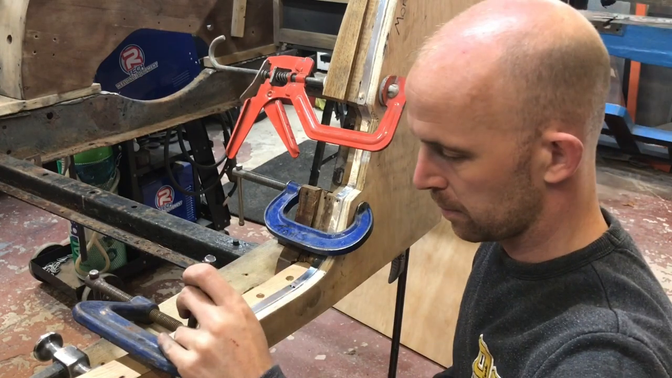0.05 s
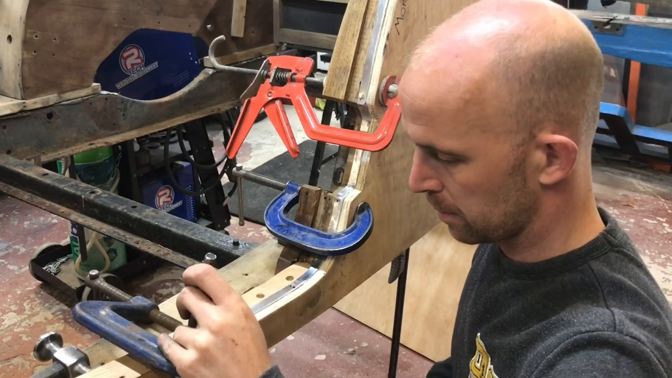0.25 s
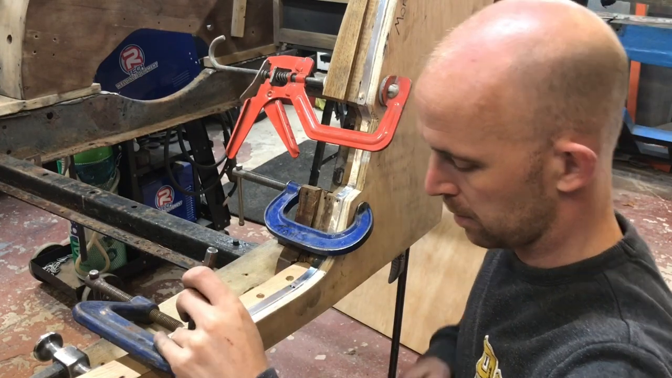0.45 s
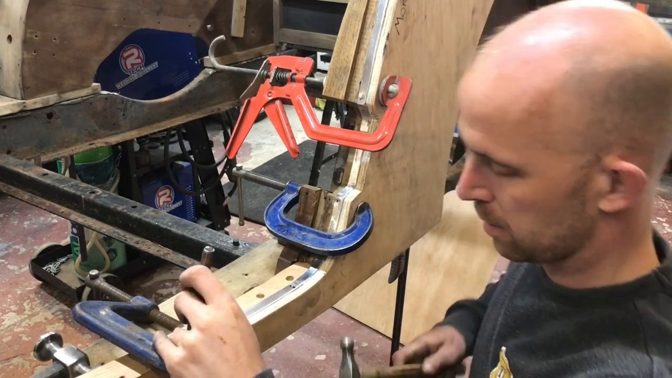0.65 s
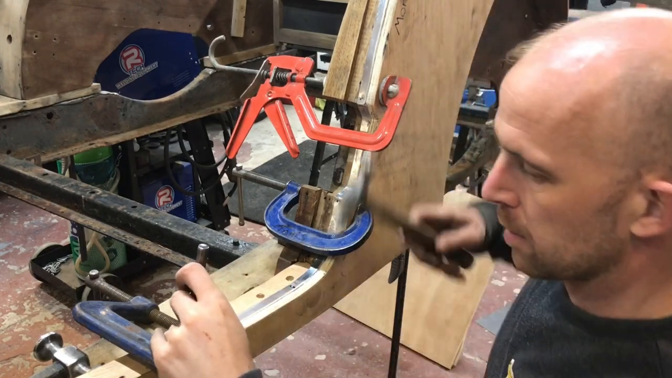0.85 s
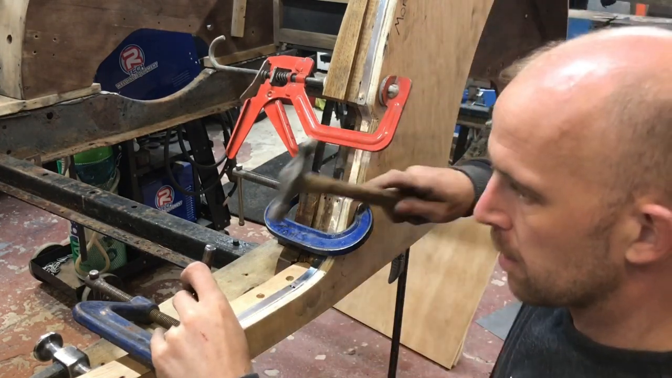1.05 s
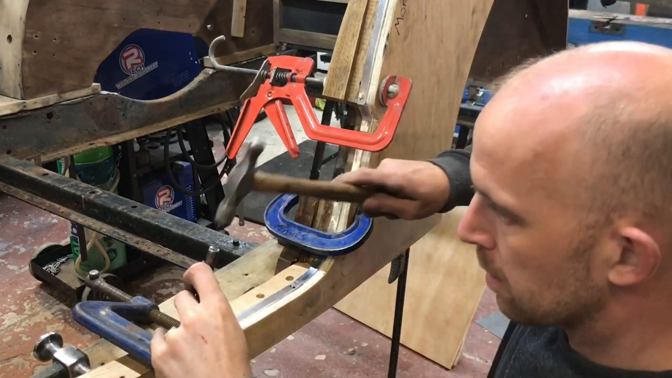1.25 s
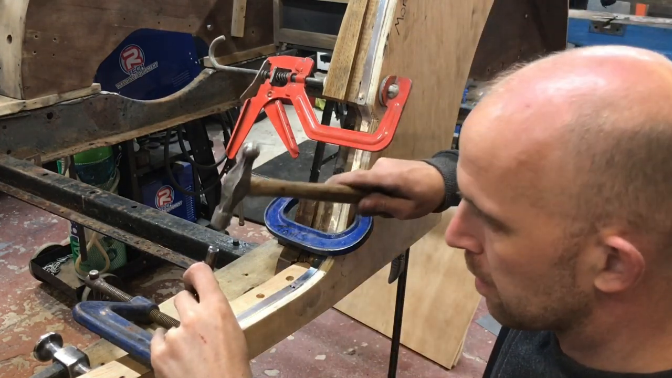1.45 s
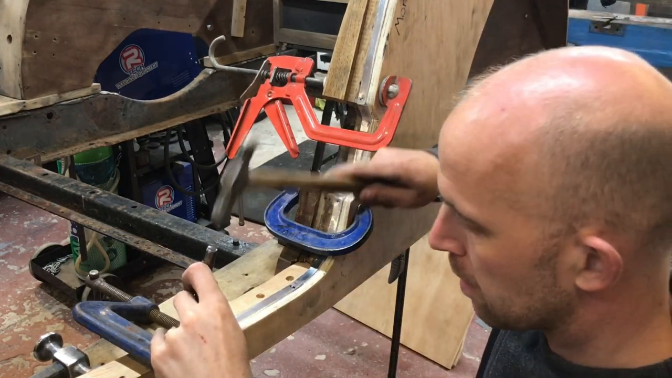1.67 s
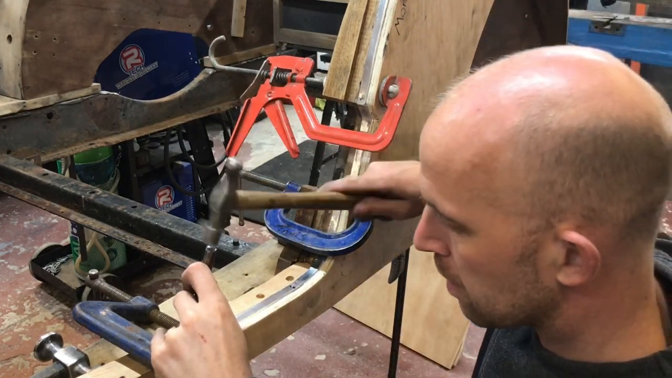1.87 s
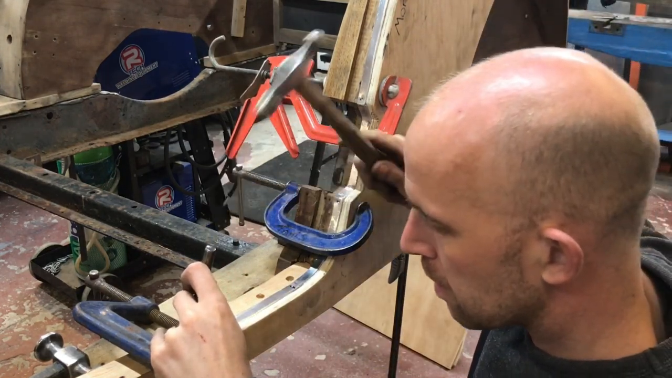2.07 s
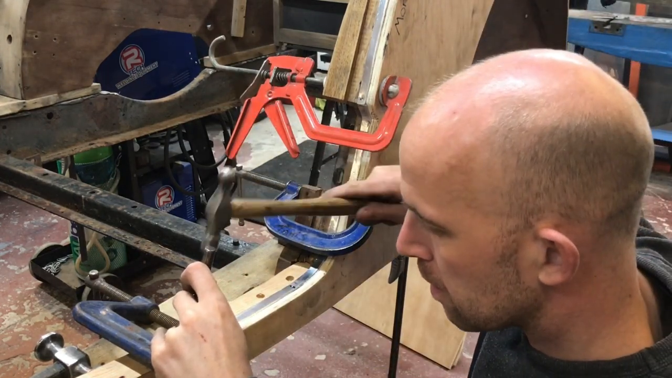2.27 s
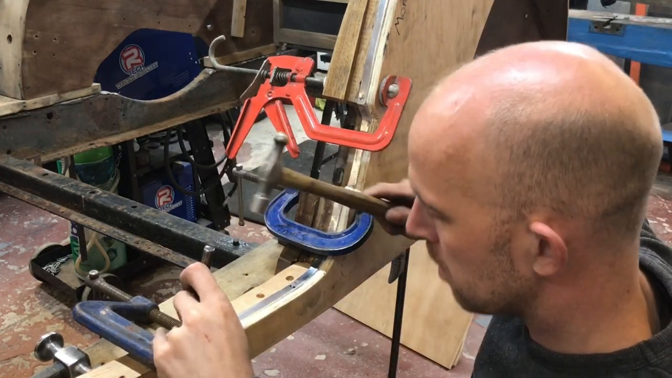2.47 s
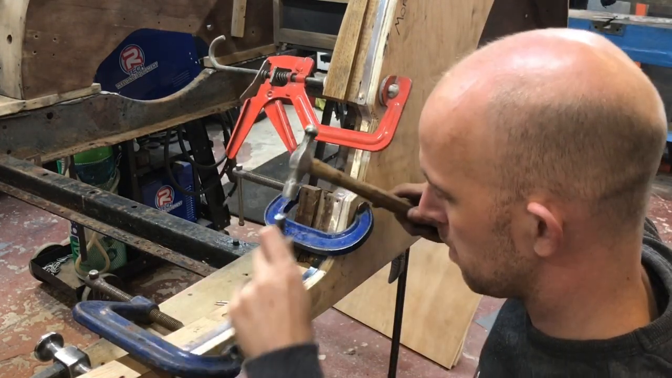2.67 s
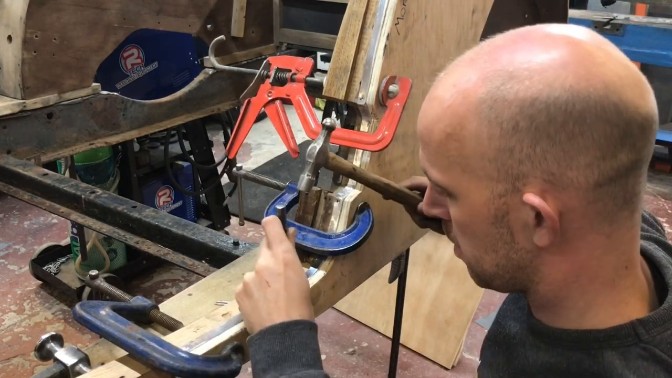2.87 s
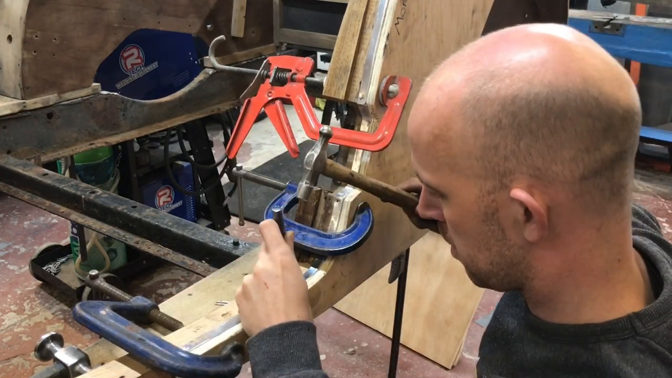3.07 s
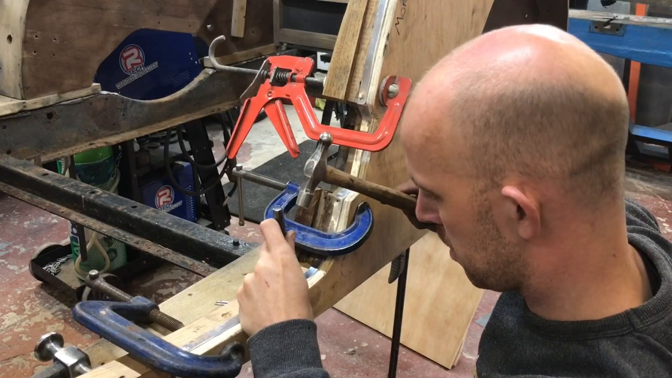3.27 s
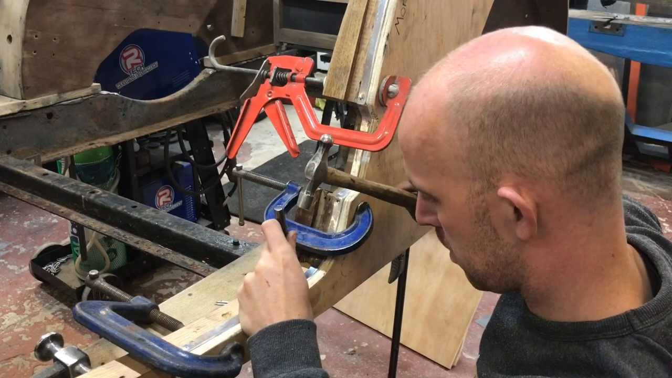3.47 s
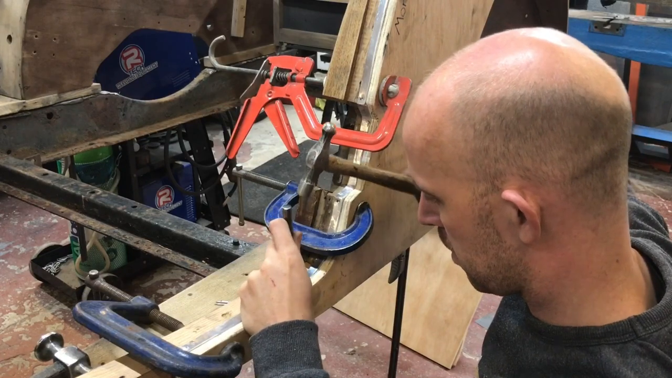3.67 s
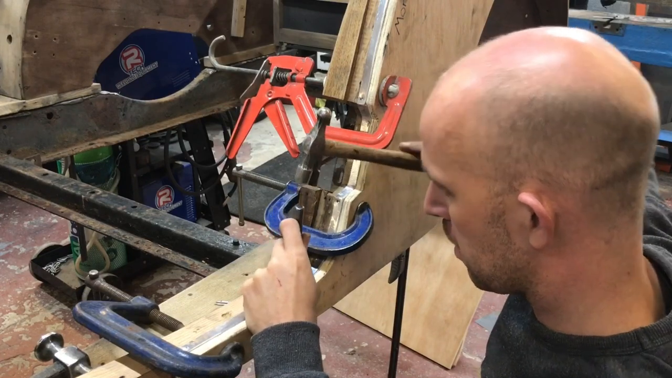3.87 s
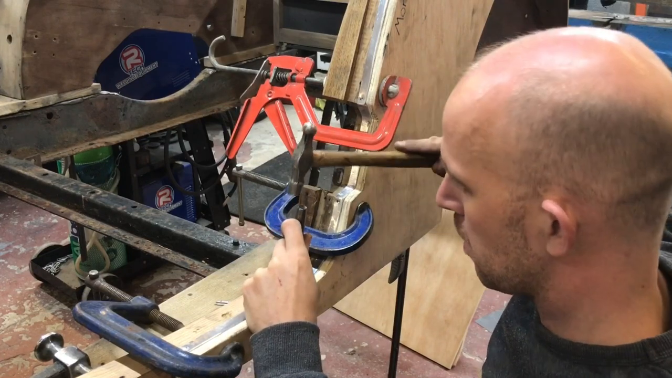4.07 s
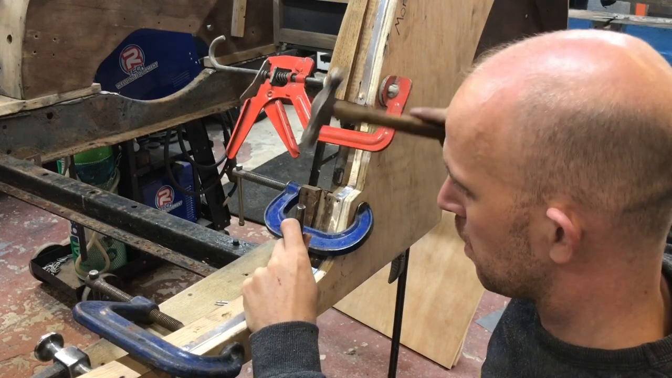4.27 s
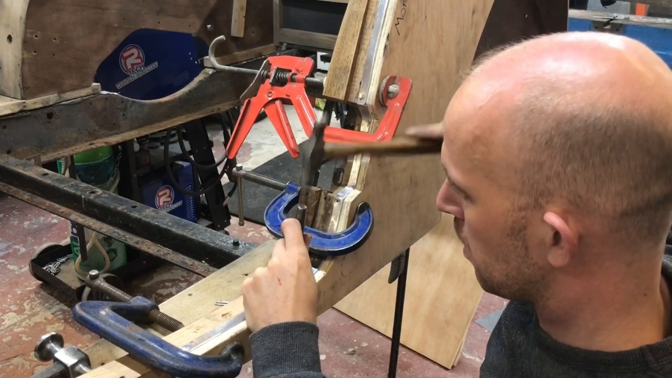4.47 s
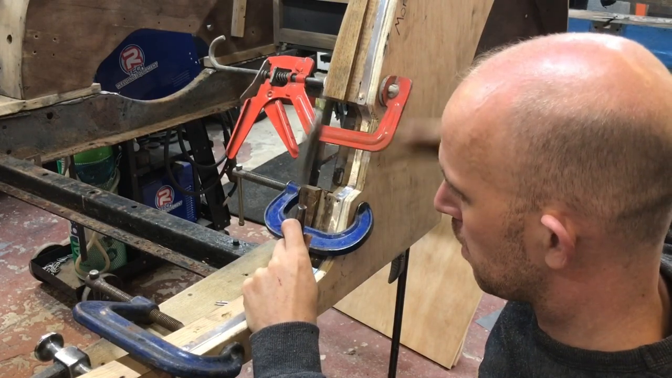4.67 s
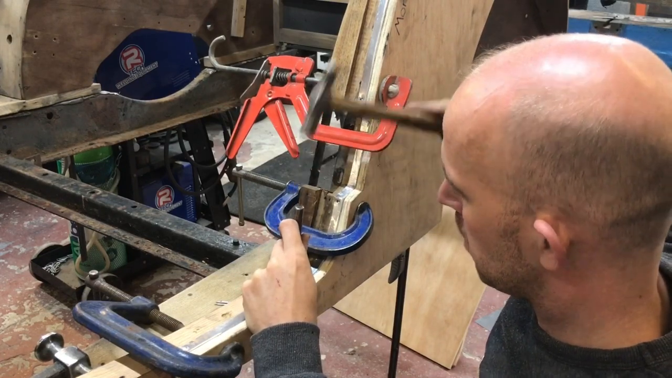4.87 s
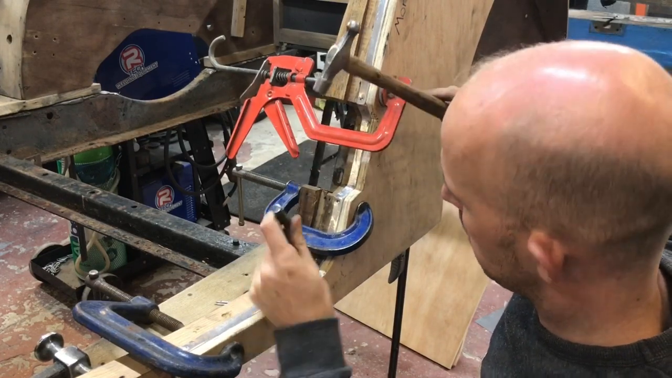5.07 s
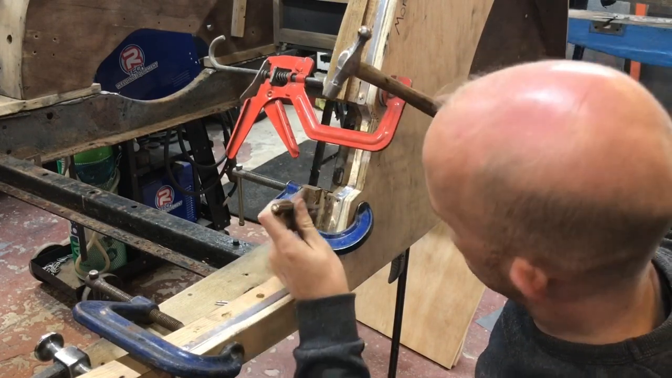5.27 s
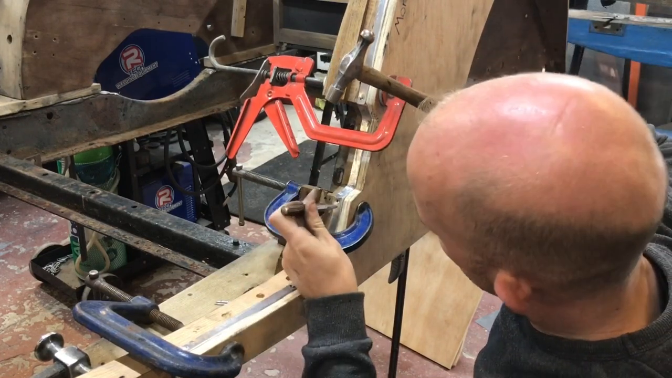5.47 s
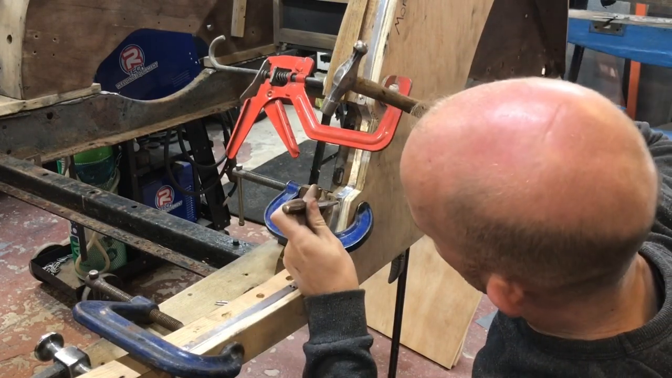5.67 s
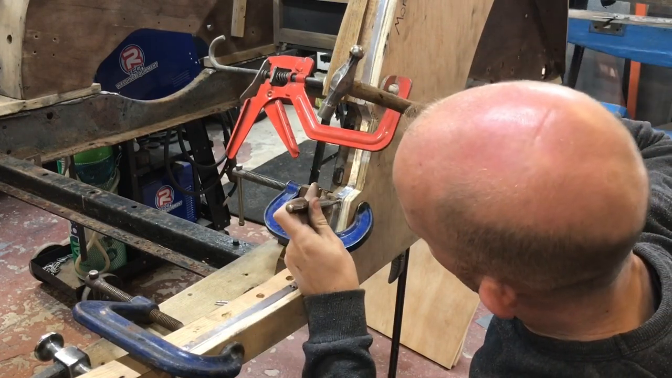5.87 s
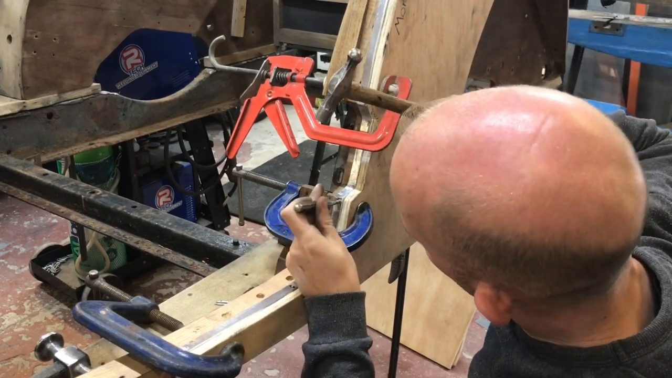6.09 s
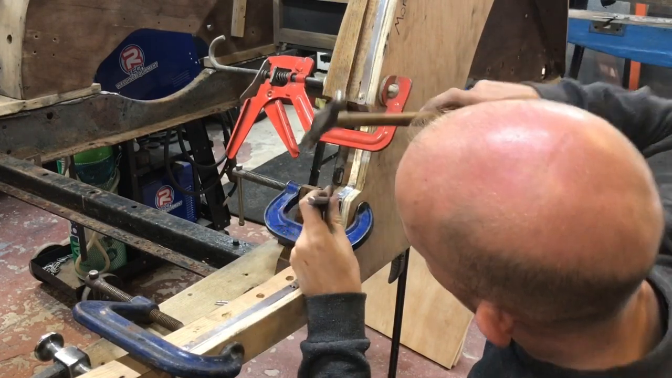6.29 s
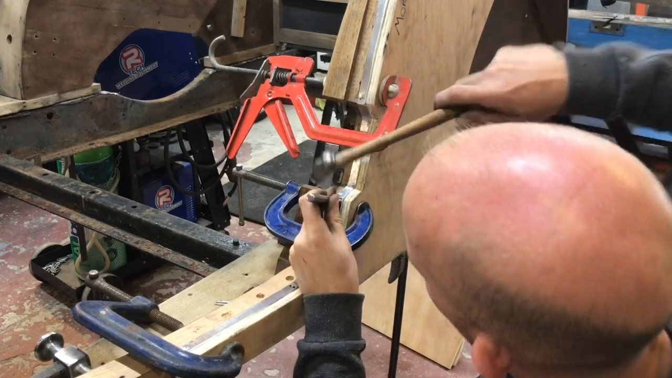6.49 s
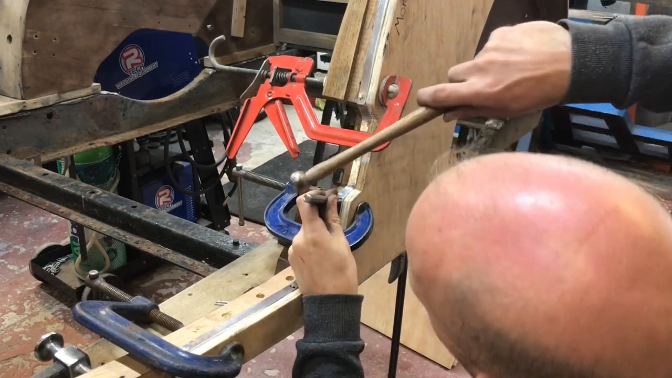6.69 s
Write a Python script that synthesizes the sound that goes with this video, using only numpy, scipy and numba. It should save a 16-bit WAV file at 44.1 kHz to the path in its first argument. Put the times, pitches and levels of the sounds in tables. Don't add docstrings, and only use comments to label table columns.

```python
import sys
import numpy as np
from scipy import signal
from scipy.fft import rfft, irfft
from scipy.io import wavfile
from scipy.ndimage import uniform_filter1d
from numba import njit

SR = 44100
rng = np.random.default_rng(int(sys.argv[2]) if len(sys.argv) > 2 else 0)


def natural_amplitude(level_db):
    exponent = np.asarray(level_db, float) / 20
    return 10 ** exponent


def generate_wav(signal):
    frames = np.transpose(np.atleast_2d(signal))
    scaled = np.clip(frames, -1, 1) * 32767
    pcm = np.round(scaled).astype(np.int16)
    wavfile.write(sys.argv[1], SR, pcm)


N = 296793


def curve(table, size):
    hz, value = np.transpose(table)
    bins_hz = np.arange(size // 2 + 1) * SR / size
    return np.interp(np.log(bins_hz + 1), np.log(hz), value)


def causal(db, size):
    cepstrum = irfft(db * np.log(10) / 20, size)
    cepstrum[1:size // 2] *= 2
    cepstrum[size // 2 + 1:] = 0
    return irfft(np.exp(rfft(cepstrum)), size)


def unit(x):
    return x / np.sqrt(np.sum(x ** 2))


def even(x, spread):
    size = 2 * len(x)
    power = uniform_filter1d(abs(rfft(x, size)) ** 2, spread)
    db = 10 * np.log10(power + 1e-12)
    return unit(signal.fftconvolve(x, causal(-db, size))[:len(x)])


def noise(table, db):
    white = rfft(rng.standard_normal(N))
    x = irfft(white * natural_amplitude(curve(table, N)), N)
    return unit(x) * np.sqrt(N) * natural_amplitude(db)


def walk(rate_hz):
    hold = int(SR / rate_hz)
    steps = np.repeat(rng.standard_normal(N // hold + 1), hold)
    return 2.2 * uniform_filter1d(uniform_filter1d(steps, hold), hold)[:N]


def modes(table, t):
    chance = rng.standard_normal((len(table), 2)) * [1.5, .0007]
    out = 0
    for (hz, db, t60), (more_db, detune) in zip(table, chance):
        fall = np.exp(-np.log(1000) * t / t60)
        out = out + natural_amplitude(db + more_db) * np.sin(2 * np.pi * hz * (1 + detune) * t) * fall
    return out


# (pitch_hz, level_db, partner_hz, cancel_s: when the two cancel)
HUM_BEATS = [
    (46.69, -65.9, 46.69, 0),
    (48.59, -58.7, 46.69, 3.466),
    (93.38, -50.2, 93.38, 0),
    (97.17, -59.0, 93.38, 3.244),
    (99.97, -58.8, 93.38, 3.2265),
]
FAINT_HUM_HZ = [73.79, 119.51, 145.76, 163.45, 186.79, 276.55, 323.25, 923.1, 1330.7, 1555, 1700.7]
FAINT_HUM_DB = [-67, -66, -62.5, -71.5, -65, -66.5, -68.5, -77.5, -85.5, -81.5, -84]
# (pitch_hz, level_db per Hz)
AIR_COLOUR = [(25, -19), (45, -4), (80, -5), (200, -9), (330, -12.5), (450, -20), (900, -19), (1600, -28),
              (2100, -34), (5000, -41), (9000, -43.5), (10500, -45), (13000, -44), (15700, -46.5)]


def hum():
    t = np.arange(N) / SR
    out = 0
    for hz, db, partner, s in HUM_BEATS:
        turns = hz * (t - s) + partner * s + (s > 0) / 2
        out = out + natural_amplitude(db + 3.5) * np.cos(2 * np.pi * turns)
    for hz, db in zip(FAINT_HUM_HZ, FAINT_HUM_DB):
        level = natural_amplitude(db + 3 + 1.5 * walk(3))
        out = out + level * np.cos(2 * np.pi * (hz * t + rng.random()))
    return out + noise(AIR_COLOUR, -56) * natural_amplitude(.6 * walk(0.61))


# (pitch_hz, level_db, t60_s: time to fall by 60 dB)
PUNCH_RING = [(8489, 0, .06), (8492, -17, .3), (9921, -16, .05)]
# (pitch_hz, level_db under the blow, t60_s)
HEAD_RING = [(7522, -27.5, 0.067), (14650, -30.5, .15), (5700, -24, .08)]
# (pitch_hz, level_db under the blow, t60_s)
STRIP_CLANK = [(630, -18.5, .12), (806, -10.5, 0.2), (1086, -9.5, .1), (2320, -11.5, 0.034),
               (2810, -15, 0.063), (3115, -9.5, 0.036), (3520, -6, 0.045), (5040, -9, 0.017)]
LEAD = SR // 2


def hammer(blows, body, rings):
    size = 8192
    out = np.zeros((2, N + LEAD + size))
    t, hz = np.arange(size) / SR, np.arange(size // 2 + 1) * SR / size
    lift = sum(db / (1 + (2 * (hz - f) / width) ** 2) for f, width, db in rings)
    for s, power_db, boom_db, bite_db, punch_db in blows:
        grains = rng.standard_normal(size) * natural_amplitude(7.4 * rng.standard_normal(size))
        chatter = unit(grains * np.exp(-t / 0.0028))
        rattle = unit(grains[::-1] * np.exp(-t / 0.0092))
        contact = natural_amplitude(4.5) * chatter + natural_amplitude(-2.0) * rattle
        contact[0] += natural_amplitude(-9.0)
        tilt = curve([(350, boom_db), (700, 0.0034), (1400, 0.0031), (2400, bite_db), (4000, bite_db),
                      (7000, -0.08)], size)
        response = causal(curve(body, size) + lift + tilt, size)
        ring = unit(signal.fftconvolve(even(contact, spread=30), response)[:size])
        punch = natural_amplitude(punch_db) * modes(PUNCH_RING, t)
        start = LEAD + int(s * SR)
        blow = natural_amplitude(power_db) * (np.sqrt(.045 * SR) * ring + modes(HEAD_RING, t))
        out[0, start:start + size] += blow + natural_amplitude(-4.5) * punch
        swell = 1 - 0.52 * np.exp(-(t / 0.0016) ** 2)
        out[1, start:start + size] += punch * swell + natural_amplitude(power_db) * modes(STRIP_CLANK, t)
    return out


# (pitch_hz, t60_s)
SHED_RING = [(100, 1), (260, 0.89), (700, 0.8), (1840, 0.68), (3000, 0.67), (4200, 0.65), (6000, .5),
             (9000, 0.48), (12800, 0.35), (16000, 0.25)]
# (delay_s, level_db)
FIRST_ECHOES = [(.0018, -5.5), (.0055, 2.5), (.0085, 2), (0.01, -9.5), (0.019, -14.5), (.027, -18.5)]


def shed(direct_db, early_db, corner_db, corner_share, rise_s, rise_cycles):
    t, bins = np.arange(SR) / SR, np.log2(np.arange(SR // 2 + 1) + 1)
    white, tail = rfft(rng.standard_normal(SR)), 0
    for octave in np.arange(6, 14.5, .5):
        hz = int(2 ** octave)
        share = np.clip(1 - 2 * abs(bins - octave), 0, 1)
        fall = np.log(1000) * t / curve(SHED_RING, SR)[hz]
        rise = 1 - np.exp(-t / (rise_s + rise_cycles / hz))
        corner = natural_amplitude(corner_db) * np.exp(-fall / corner_share)
        tail = tail + irfft(white * share, SR) * unit(rise * (np.exp(-fall) + corner))
    for s, db in FIRST_ECHOES:
        after = np.maximum(t - s, 0)
        burst = rng.standard_normal(SR) * (after > 0) * np.exp(-after / 0.00032)
        tail += natural_amplitude(early_db + db) * unit(burst)
    quick = signal.butter(1, 900, "high", fs=SR)
    return unit(tail + natural_amplitude(direct_db) * signal.lfilter(*quick, t == 0))


def heard(blows, body, rings, corner_db, corner_share):
    sound, punch = hammer(blows, body, rings)
    room = shed(direct_db=-6.5, early_db=-13.5, corner_db=corner_db, corner_share=corner_share,
                rise_s=0.00095, rise_cycles=1.4)
    echoing = signal.fftconvolve(sound, even(room, spread=200))[:len(punch)]
    return (echoing + punch)[LEAD:LEAD + N]


# (start_s, power_db, frame_boom_db, strip_bite_db, punch_ring_db)
SEATING_BLOWS = [
    (1.5870, -9, -3.5, 0.6, -10.5),
    (1.6207, -25.5, -7.5, 2.3, -24.5),
    (-0.33, -17.5, -8.5, -10, -35),
]
# (pitch_hz, level_db per Hz)
SEATING_BODY = [(59, -52), (100, -21.5), (324, -3.5), (518, -6.5), (564, -3.5), (745, -7), (1070, -8),
                (1540, -17), (3250, -9), (3940, -17.5), (7980, -22), (8690, -22.5), (9270, -23.5),
                (15100, -30), (16500, -52.5)]
# (pitch_hz, width_hz, lift_db)
SEATING_RINGS = [(285, 90, 6.6), (710, 90, 2.9), (1000, 140, 7), (2190, 150, 5.1), (2680, 200, 6),
                 (3246, 200, 1.2), (5440, 740, 3), (1330, 200, 3.4)]


def seating_blows():
    return heard(SEATING_BLOWS, SEATING_BODY, SEATING_RINGS, corner_db=10.5, corner_share=0.29)


# (start_s, peak_db)
DULL_TAPS = [(.397, -39), (.4135, -49), (0.4262, -34), (.480, -47), (.779, -51), (.793, -46.5),
             (5.872, -56)]
# (start_s, peak_db)
SHARP_SNAPS = [(.174, -50.5), (.4145, -34), (.4153, -27.5), (.4335, -34), (3.258, -62), (3.898, -63.5),
               (5.818, -62), (5.922, -53), (6.287, -52)]
# (start_s, peak_db)
FINE_CRACKLES = [(.132, -66), (.822, -60), (1.122, -59), (1.338, -64), (1.392, -60), (2.922, -60.5),
                 (3.144, -58), (3.522, -60), (3.822, -59.5), (4.108, -57), (5.153, -60), (6.158, -56),
                 (6.522, -62)]
# (low_hz, high_hz)
TICK_RANGES = [
    (3300, 5500),
    (3000, 15300),
    (13000, 16000),
]


def ticks():
    out, short = np.zeros(N), np.arange(600) / SR
    for events, range_hz in zip((DULL_TAPS, SHARP_SNAPS, FINE_CRACKLES), TICK_RANGES):
        band = signal.butter(1, range_hz, "band", fs=SR, output="sos")
        for s, db in events:
            burst = rng.standard_normal(len(short)) * np.exp(-short / .0004)
            tick = signal.sosfilt(band, signal.sosfilt(band, burst))
            start = int(s * SR)
            out[start:start + len(short)] += natural_amplitude(db) * tick / abs(tick).max()
    return out


# (pitch_hz, level_db per Hz)
CLOTH_COLOUR = [(710, -6), (1200, -10), (1310, 0), (1400, -14), (2530, -10.5), (4080, -8), (9510, -19),
                (10400, -17.5), (15200, -11), (16000, -9)]
# (start_s, hold_s, level_db, fine_hiss_db over the level)
SLEEVE_STROKES = [
    (0.297, 0.074, -61, -6.5),
    (.412, 0.026, -56, -1),
    (0.774, 0.017, -64.5, -2.1),
    (0.884, .012, -73, -1),
    (6.158, .05, -71, 1),
    (6.317, .04, -63.5, -12),
    (6.447, .06, -75, 2),
    (6.597, 0.074, -81, 2.1),
]


def rustle():
    rise_db_s, fall_db_s = 700, 115
    t, out = np.arange(N) / SR, 0
    cloth = noise(CLOTH_COLOUR, 1.5) * natural_amplitude(1.1 * walk(67) + 0.87 * walk(600))
    coarse = signal.sosfilt(signal.butter(4, 8000, fs=SR, output="sos"), cloth)
    fine = signal.sosfilt(signal.butter(4, 8000, "high", fs=SR, output="sos"), cloth)
    for s, hold_s, db, fine_db in SLEEVE_STROKES:
        under_db = rise_db_s * np.maximum(s - t, 0) + fall_db_s * np.maximum(t - s - hold_s, 0)
        out = out + natural_amplitude(db - under_db) * (coarse + natural_amplitude(fine_db + 4.0) * fine)
    return out


# (centre_s, level_db, pitch_hz, half_length_s)
HAND_THUD = [
    (0.466, -42.5, 282, 0.026),
    (0.48, -53, 140, 0.017),
    (0.46, -63, 720, 0.041),
]


def thud():
    t, out = np.arange(N) / SR, 0
    for s, db, hz, half in HAND_THUD:
        out = out + natural_amplitude(db) * np.exp(-((t - s) / half) ** 2) * np.sin(2 * np.pi * hz * t)
    return out


# (start_s, level_db)
REBOUNDS = [
    (1.6199, 1.5),
    (4.7664, -2.5),
]
# (pitch_hz, level_db, t60_s)
REBOUND_CLACK = [(2200, -8, .018), (3050, -5, .018), (3450, -7, .016), (5700, -13, .012), (9900, -16, .012)]


def bounces():
    out, t = np.zeros(N), np.arange(2000) / SR
    for s, db in REBOUNDS:
        start = int(s * SR)
        out[start:start + len(t)] += natural_amplitude(db) * modes(REBOUND_CLACK, t) * (1 - np.exp(-t / .001))
    return out


# (start_s, power_db, frame_boom_db, strip_bite_db, punch_ring_db)
NEAR_BLOWS = [
    (1.8787, -4.5, 1, 1, -9),
    (2.1830, -3.5, 0.5, 0, -29.5),
]
# (pitch_hz, level_db per Hz)
NEAR_BODY = [(59, -47.5), (100, -24.5), (230, -4.5), (456, -6.5), (628, -4.5), (778, -6), (1030, -5),
             (1950, -12.5), (3540, -6.5), (4880, -20), (6180, -12), (7980, -24.5), (12500, -16.5),
             (15500, -25.5), (16500, -59.5)]
# (pitch_hz, width_hz, lift_db)
NEAR_RINGS = [(235, 40, 0), (280, 87, 3), (624, 100, 3.5), (825.5, 80, 2.5), (1020, 90, 4.5),
              (1340, 220, 3), (2670, 300, 5), (3252, 250, 3.5), (4400, 500, 3.5), (9560, 600, 6.5),
              (11000, 700, -8), (13910, 700, -3.5)]


def near_blows():
    return heard(NEAR_BLOWS, NEAR_BODY, NEAR_RINGS, corner_db=7.5, corner_share=0.4)


# (start_s, power_db, frame_boom_db, strip_bite_db, punch_ring_db)
FAR_BLOWS = [
    (4.4157, -7, -0.66, 0.11, -7.5),
    (4.7076, -4, 1.1, 0.1, -8.5),
    (4.7670, -23.5, -0.8, 0.1, -21.5),
]
# (pitch_hz, level_db per Hz)
FAR_BODY = [(59, -60.5), (100, -26), (225, -5), (262, -7.5), (410, -6.5), (699, -5), (865, 0), (1750, -9.5),
            (2990, -1), (4880, -14.5), (6050, -8), (7650, -19), (12500, -14), (15500, -22), (16500, -45.5)]
# (pitch_hz, width_hz,
# lift_db)
FAR_RINGS = [(400, 35, 5), (844, 38, 2), (1150, 220, 1), (1517, 87, 7.5), (2297, 60, 3.5),
             (2780, 100, -0.5), (3277, 200, 6.5), (3800, 300, 4), (4500, 400, -3.5), (9500, 600, 3),
             (10760, 700, -6.5), (13900, 790, -5)]


def far_blows():
    return heard(FAR_BLOWS, FAR_BODY, FAR_RINGS, corner_db=5.5, corner_share=0.37)


def scene():
    blows = seating_blows() + bounces() + near_blows() + far_blows()
    close = ticks() + rustle() + thud()
    return (hum() + close + blows)[None]


@njit
def follow(x, attack, release):
    e, out = 0., np.empty(len(x))
    for i in range(len(x)):
        e += (x[i] - e) * (attack if x[i] > e else release)
        out[i] = e
    return out


def pre_echo(x, whole_db, half_db, ring_db):
    ahead = 1000
    quick = uniform_filter1d(abs(x), 40) + 1e-9
    lagging = signal.lfilter([.004], [1, .004 - 1], quick)
    attack = x * np.clip(1.15 - lagging / quick, .1, 1)
    attack = np.pad(attack, ((0, 0), (0, ahead)))
    leak = natural_amplitude(whole_db) * attack[:, ahead:] + natural_amplitude(half_db) * attack[:, ahead // 2:ahead // 2 + N]
    band = signal.butter(1, [3060, 3130], "band", fs=SR)
    ring = signal.lfilter(*band, x[:, ::-1])[:, ::-1]
    return x + leak + natural_amplitude(ring_db) * ring


def low_pass(x):
    return signal.sosfilt(signal.butter(12, 16790, fs=SR, output="sos"), x)


def record(dry):
    x = signal.sosfilt(signal.ellip(8, .2, 45, 15700, fs=SR, output="sos"), dry)
    felt = follow(abs(x[0]), 1 / (0.0012 * SR), 1 / (.12 * SR))
    x = x * np.minimum(1, natural_amplitude(-20.5) / (felt + 1e-9)) ** 0.28
    x = .93 * np.tanh(x / .93)
    x = signal.sosfilt(signal.butter(4, 41, "high", fs=SR, output="sos"), x)
    x = signal.sosfilt(signal.butter(14, 16200, fs=SR, output="sos"), x)
    fade_s = .009
    x = x * np.clip(np.arange(N, 0, -1) / (fade_s * SR), 0, 1)
    mix = pre_echo(x, whole_db=-32.0, half_db=-39.0, ring_db=-10.0)
    return low_pass(mix)


dry = scene()
out = record(dry)
generate_wav(out)
```